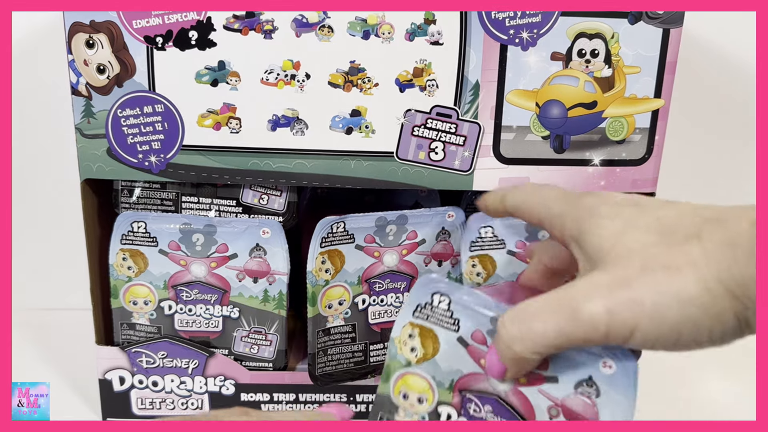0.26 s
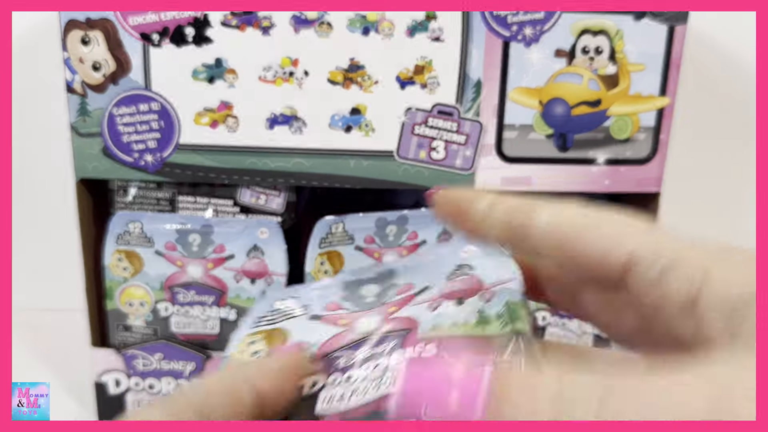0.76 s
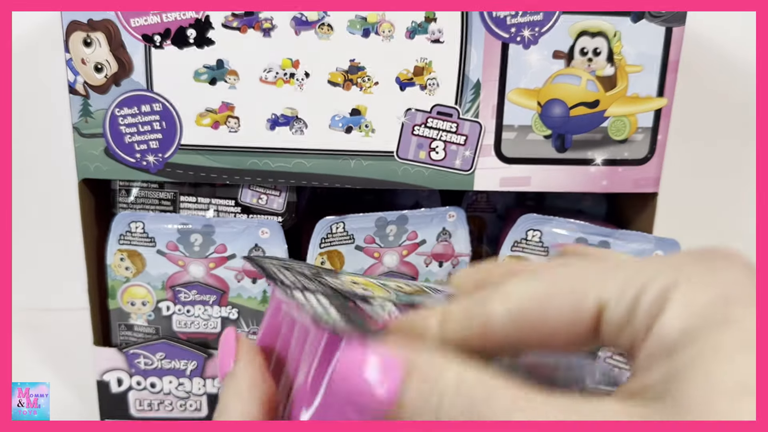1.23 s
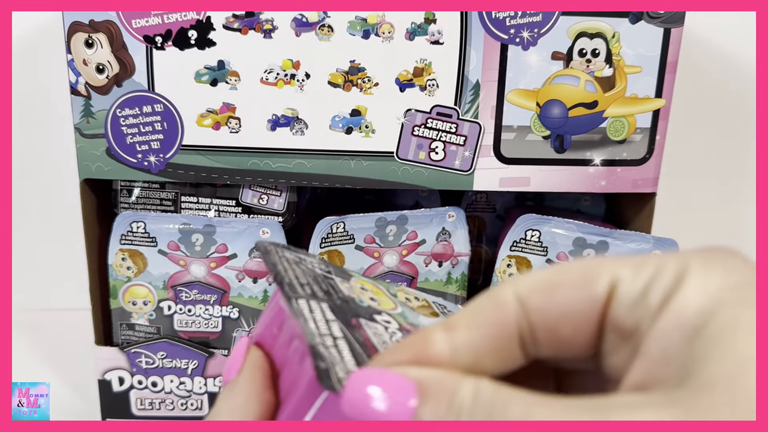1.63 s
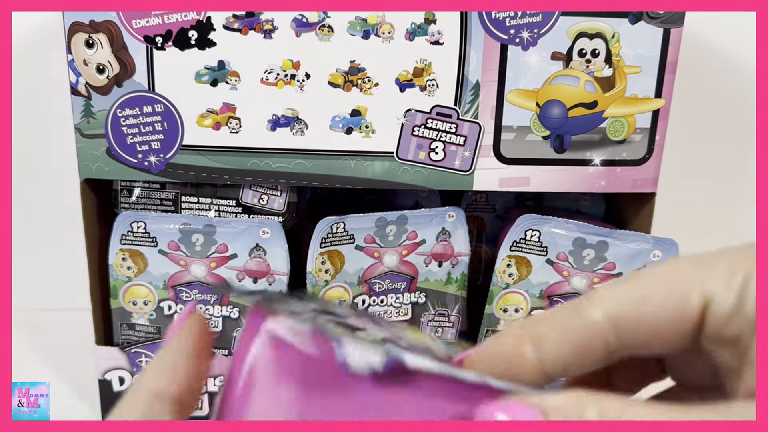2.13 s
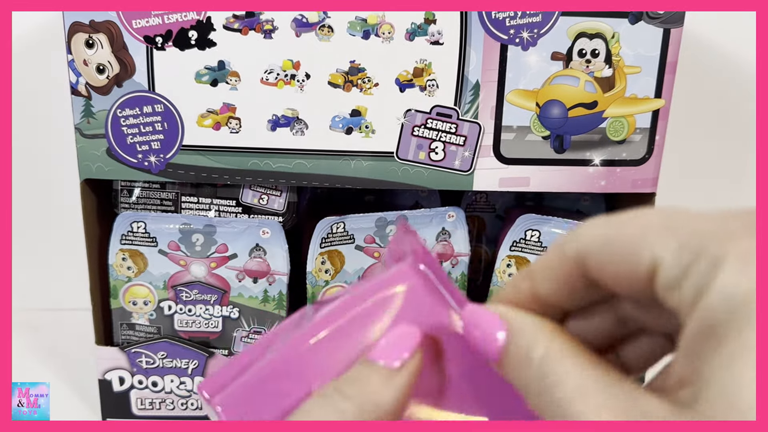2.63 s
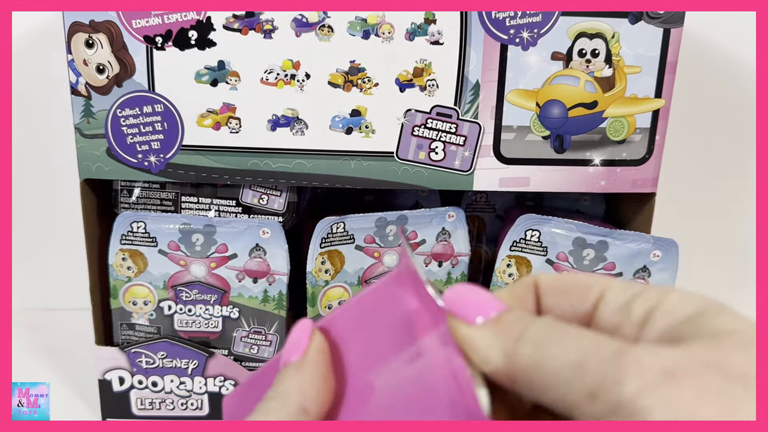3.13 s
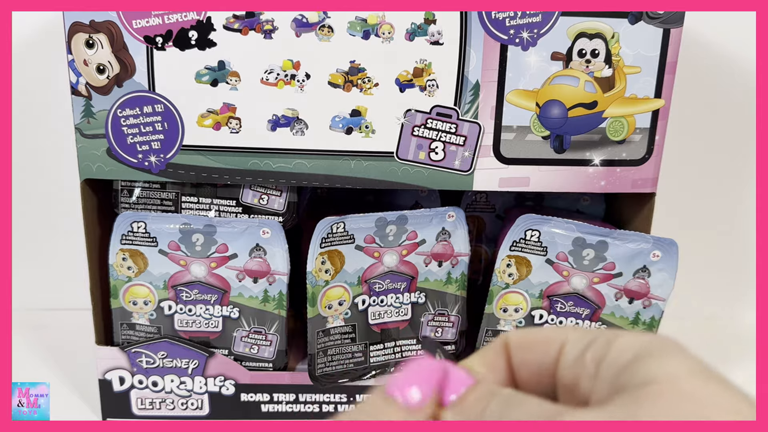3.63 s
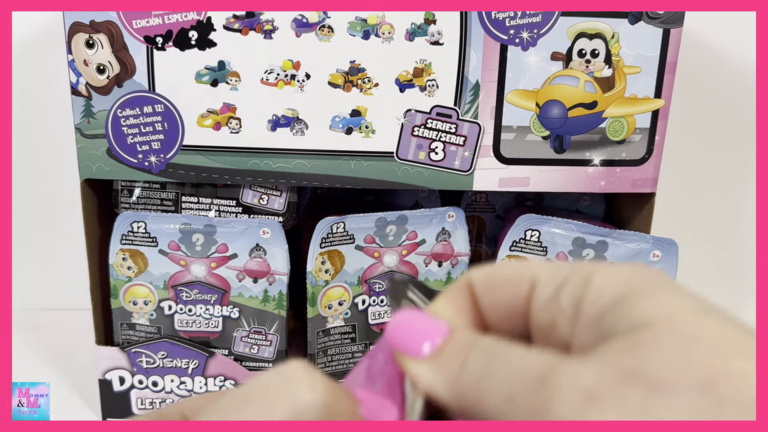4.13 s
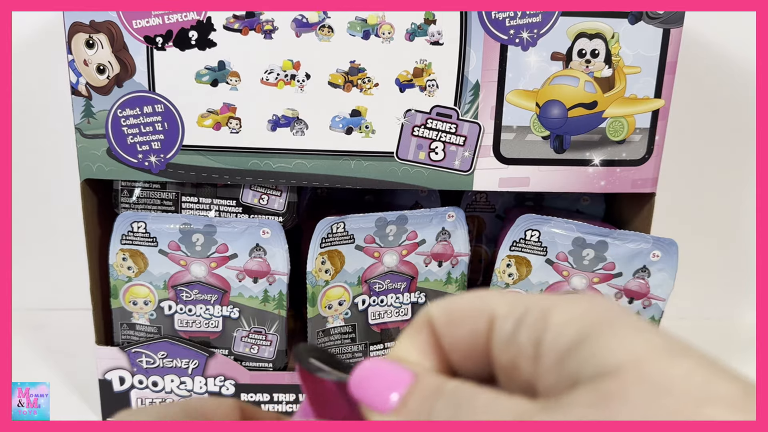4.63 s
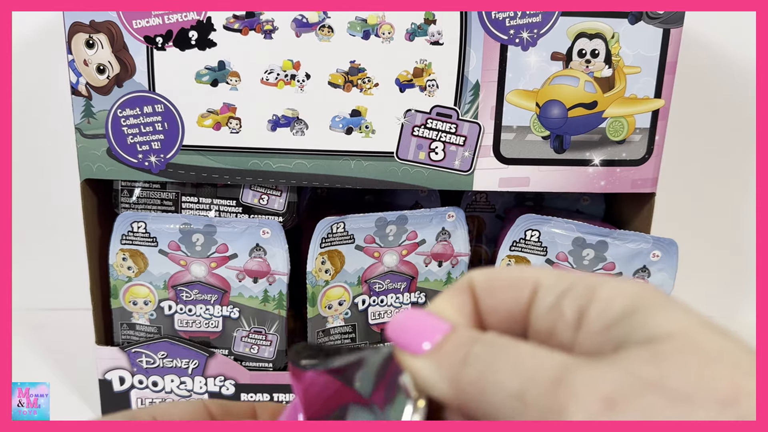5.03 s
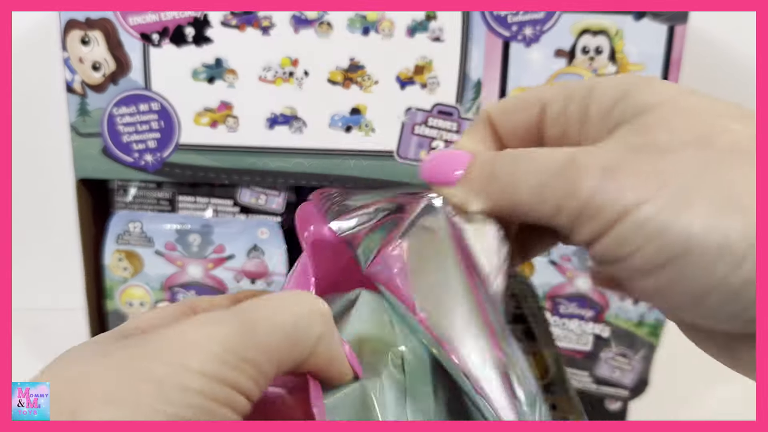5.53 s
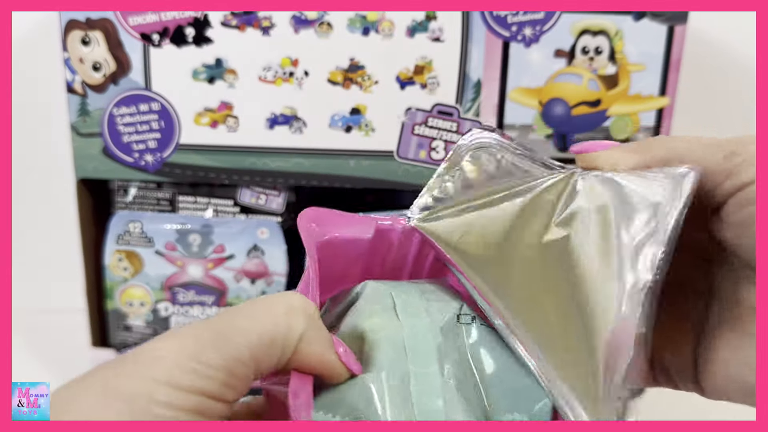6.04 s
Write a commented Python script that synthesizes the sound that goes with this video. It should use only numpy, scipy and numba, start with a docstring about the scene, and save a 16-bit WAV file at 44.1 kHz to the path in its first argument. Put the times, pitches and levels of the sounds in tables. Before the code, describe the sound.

Close, crisp crackles and hollow pops of a foil pouch being handled, then ripped open by hand.

```python
"""A foil packet is pulled from a carton, turned in the fingers and torn open close to a stereo phone.
Each crease buckles in a short run of slips: a bright crack, a ring of the sheet, then a puff of the air
in the bag. The hollow pouch pops under the fingers and countless small creases rustle in between,
in a small dry room over a low hum."""
import sys
import numpy as np
from scipy import signal
from scipy.fft import rfft, irfft
from scipy.io import wavfile
from numba import njit

SR = 44100
rng = np.random.default_rng(int(sys.argv[2]) if len(sys.argv) > 2 else 0)


def dump_mix(stems):
    """Bounce the given channels to the path in sys.argv[1] as a 16-bit WAV at rate SR."""
    frames = np.atleast_2d(stems).T  # one column per channel
    limited = np.clip(frames, -1, 1)  # hard clip at full scale
    pcm = np.round(limited * 32767).astype(np.int16)
    wavfile.write(sys.argv[1], SR, pcm)


N = 276948

# Modes of the air in the bag, the foil sheet and a crease.
# Each row: frequency in Hz, energy share in dB, seconds to fade 60 dB.
BAG = [(80, -5, 0.14), (143.5, -3, 0.1), (205, -7, 0.074), (260.8, 1, 0.065), (317.6, 3, 0.056),
       (424, -1, 0.029)]
SHEET = [(525, 0, 0.031), (711, 1.6, 0.026), (925, -2.5, 0.019), (1137, -1.5, 0.017), (1644, -1, 0.017),
         (2153, -0.14, 0.01), (2918, 0.5, 0.007), (3797, 4.5, 0.004), (5280, 5.5, 0.003)]
CREASE = [(4500, -4, .002), (6300, -5, .0017), (8200, -1, .0017), (10000, 0, .0015), (12300, -1, .0012),
          (15000, 0, .0012)]


def snaps(slips_per_ms, scatter_db, settle_ms, settle_db, max_slips, settle_slips):
    """Creases buckle in runs of slips that crack, ring and puff; weaker slips follow as the foil settles."""
    # Each row: start in seconds, length in ms, sheet energy in dB, crack and puff in dB over the sheet.
    buckles = [(.024, 9.2, -35.5, -20, -6), (0.044, 14.6, -29, -63, -1.5), (0.063, 1.52, -33.5, 2, -3),
               (0.114, 34, -27, -36, 3), (.264, 13.3, -34.5, -0.5, -17), (0.284, 23.8, -26, -7, -8),
               (.537, 34, -26, -11, 2.5), (.61, 37.5, -27, -12, 1), (.645, 2.2, -28.5, -10, 4),
               (.799, 2.2, -31.5, 0, -16), (.869, 4.66, -31.5, -4, -5.5), (1.195, 1.05, -25, -15, -39),
               (1.272, 9.05, -25, -9, -22), (1.821, 3.03, -19, 0, -15.5), (2.071, 3.37, -31.5, -11.5, -4),
               (2.494, 3.13, -31, -6.5, -3.5), (2.901, 1.03, -20, 6, -12), (3.02, 4.44, -29, -18.5, 0.5),
               (3.338, 5.87, -29, -5, -7), (3.377, 26.2, -26.5, -8, -6), (3.408, 9.4, -27, -17, -5),
               (3.433, 0.99, -32, -5.5, -8), (3.476, 1.3, -22.5, -1, -8), (3.615, 0.91, -25.5, -5, -8.5),
               (3.65, 60, -41, -13, -17), (3.961, 11.3, -17, -1.5, -15), (4.202, 26.8, -15.5, 3.5, -8),
               (4.444, 10.5, -29.5, 6.5, -18), (4.457, 7.17, -26.5, 5, -15.5),
               (4.533, 2.15, -23.5, 6.5, -7), (4.551, 3.96, -18, -0.5, -7.5), (4.669, 4.35, -21.5, 8, -9.5),
               (4.684, 2.62, -16, -16, -10), (4.837, 2.24, -30.5, 0.5, -15), (4.875, 0.88, -23, 3.5, -15),
               (4.961, 1.12, -30, 6.5, -39), (4.991, 0.98, -26.5, 5, -0.5), (5.054, 1.98, -31.5, -2, -2),
               (5.174, 5.13, -33, 3.5, -11), (5.222, 1.23, -26, 2, -5.5), (5.242, 1.085, -28, 3, -17),
               (5.498, 7.6, -31.5, 1, -4), (5.533, 1.34, -23.5, 5.5, -2.5), (5.545, 49.8, -17, 2, -2.5),
               (5.632, 6.5, -25.5, 11, -4.5), (5.66, 17.7, -24, 0, -26), (5.684, 12.15, -23.5, 8, -4),
               (5.799, 8.2, -30.5, 14.5, 1), (5.858, 7.7, -26, 6, 1), (5.941, 1.09, -23.5, 6, -3.5),
               (6.004, 6.32, -25, 11.5, -6.5), (6.056, 1.08, -30, 4.5, -10), (6.12, 2.01, -25.5, 11, -1.5),
               (6.17, 2.1, -27.5, 5, -13.5), (6.248, 6.1, -23, 5.5, -2)]
    s, ms, db, crack_db, puff_db = np.transpose(buckles)
    ring_hz = 1383 * 2 ** (.03 * crack_db - .015 * puff_db)  # crisper rings higher, puffier lower
    when, size = np.moveaxis(rng.random((len(s), max_slips + settle_slips, 2)), 2, 0)
    when[:, 0], size[:, 0] = 0, .3  # a light slip leads
    when[:, 2], size[:, 2] = np.minimum(.8 / ms, .6), .93  # a firm one follows
    when[:, 1] = 1  # another closes the run
    late_ms = when * ms[:, None]
    # a longer snap shares its energy among more slips
    used = np.clip(3 + slips_per_ms * ms[:, None] - np.arange(max_slips + settle_slips), 0, 1)
    energy = used * undb(-2 * scatter_db * np.log(1 - size))
    energy /= energy.sum(axis=1, keepdims=True)
    # settling slips thin out and weaken with time
    remaining = 1 - when[:, max_slips:]
    late_ms[:, max_slips:] = ms[:, None] - settle_ms * np.log(remaining)
    energy[:, max_slips:] = undb(2 * settle_db) * size[:, max_slips:] * remaining
    snap, slip = np.nonzero(energy)
    slip_s = s[snap] + late_ms[snap, slip] / 1000
    slip_db = db[snap] + 10 * np.log10(energy[snap, slip])
    main = slip < max_slips
    crack = ring(CREASE, slip_s + .00033, slip_db + crack_db[snap],
                 push_s=.000074, colour_db=4.7, detune=.1, spread=.16)
    sheet = ring(SHEET, slip_s + .0005, slip_db,
                 push_s=.000091, colour_db=3, detune=.079, spread=.68, centre_hz=ring_hz[snap], octaves=1.43)
    puff = ring(BAG, slip_s[main] + .0022, (slip_db + puff_db[snap])[main],
                push_s=.0013, colour_db=1.75, detune=.091, spread=.15)
    return crack + sheet + puff


def pouch_pops():
    """The hollow pouch rings under a finger or a hard snap; higher pops have a crisper edge."""
    # Each row: start in seconds, energy in dB, pitch in Hz.
    knocks = [(.184, -29.5, 320), (.24, -31.5, 710), (.392, -35.5, 417), (.58, -34, 1392),
              (1.048, -29, 1560), (1.47, -29, 1074), (1.552, -39.5, 1010), (1.789, -34.5, 899),
              (1.824, -13, 1580), (2.095, -36.5, 517), (2.297, -33.5, 783.4), (2.585, -30.5, 672),
              (2.902, -20.5, 1002), (2.99, -25, 2070), (3.047, -18, 400), (3.093, -26, 522),
              (3.127, -24, 405), (3.176, -37, 370), (3.204, -30, 1110), (3.226, -35.5, 1598),
              (3.255, -38.5, 686), (3.479, -19.5, 1145), (3.827, -25.5, 296), (4.162, -38.5, 271.7),
              (4.195, -30, 699.3), (4.817, -36, 928.2), (4.877, -26, 559.2), (4.938, -28, 501.2),
              (4.991, -20.5, 2440), (5.19, -33.5, 2150), (5.243, -28, 1661), (5.275, -27.5, 1060),
              (5.369, -28, 519), (5.394, -32.5, 2160), (5.454, -35.5, 378), (5.903, -34, 724)]
    # Each row: multiple of the pitch, energy share in dB, cycles to fade 60 dB.
    pouch_modes = [(.55, -9.5, 13), (1, -1.5, 14), (1.5, -6.5, 9.5), (2.2, -6.5, 8)]
    s, db, hz = np.transpose(knocks)
    body = ring(pouch_modes, s, db,
                push_s=.00066, colour_db=1.46, detune=.032, spread=.24, pitch=hz[:, None])
    s, db, hz = np.repeat(knocks, 3, axis=0).T  # three quick slips to an edge
    edge_db = db - 11.5 + 5.1 * np.log2(hz / 1383)
    edge = ring(SHEET[4:] + CREASE, s + .0043 * rng.random(len(s)), edge_db,
                push_s=.00026, colour_db=1.8, detune=.16, spread=.3, centre_hz=2 * hz, octaves=2)
    return body + edge


def crease_ticks():
    """Lone thin ticks of a crease edge, each split into three quick slips."""
    # Each row: start in seconds, energy in dB.
    ticks = [(1.241, -34.5), (1.514, -33.5), (2.476, -30.5), (2.967, -23.5), (3.075, -39), (3.316, -29),
             (3.79, -36), (3.97, -11), (4.469, -22), (5.096, -37), (5.518, -18.5), (6.095, -30),
             (6.215, -32)]
    s, db = np.repeat(ticks, 3, axis=0).T
    return ring(CREASE, s + .003 * rng.random(len(s)), db - 10 * np.log10(3),
                push_s=.0002, colour_db=2, detune=.1, spread=.3)


def rustle():
    """Skin rubs the foil in a fine hiss, small creases tick and ring, the bag rumbles along."""
    s, _, treble_db = small_slips(per_s=1200, scatter_db=1.3, patchy_db=5.9)
    rub = ring(CREASE, s, treble_db - 10, push_s=.0001, colour_db=2.4, detune=.14, spread=.26,
               centre_hz=np.full(len(s), 8200.), octaves=.46)
    s, sheet_db, treble_db = small_slips(per_s=400, scatter_db=4.25, patchy_db=2.4)
    ticks = ring(CREASE, s[::20], treble_db[::20] - 1, push_s=.00024, colour_db=4.9, detune=.2, spread=.26)
    sheet = ring(SHEET, s, sheet_db - 11, push_s=.0006, colour_db=5, detune=.1, spread=.7,
                 centre_hz=np.full(len(s), 950.), octaves=1.8)
    rumble = ring(BAG, s[::8], sheet_db[::8] - 3.5, push_s=.0021, colour_db=5.4, detune=.15, spread=.15)
    return rub + ticks + sheet + rumble


def small_slips(per_s, scatter_db, patchy_db):
    """Times, sheet levels and treble levels of random slips: mostly faint, coming in patches."""
    # Each row: time in seconds, base level of the sheet rustle in dB, of the treble rustle in dB.
    handling = [(0, -63, -76), (.04, -45.5, -61.5), (0.56, -48.5, -64.5), (1.38, -44.5, -58),
                (1.55, -53, -79), (1.78, -80, -76), (1.9, -43, -54.5), (2.3, -48.5, -65.5),
                (2.44, -45.5, -57), (2.68, -60, -70.5), (3.5, -54.5, -66), (3.67, -57.5, -62.5),
                (4.34, -54.5, -67), (4.69, -52, -49), (5.11, -56, -68), (5.27, -42.5, -54),
                (5.51, -44, -66), (5.58, -25, -31), (5.74, -46, -50), (6.28, -43.5, -82)]
    t, *curves = np.transpose(handling)
    when, size = rng.random((int(per_s * N / SR), 2)).T
    patches = np.interp(when, np.linspace(0, 1, 200), rng.standard_normal(200))
    swing_db = patchy_db * patches - scatter_db * np.log(1 - size * .975)
    s = when * N / SR
    return [s] + [np.interp(s, t, curve) + swing_db for curve in curves]


def ring(modes, s, db, push_s, colour_db, detune, spread, centre_hz=None, octaves=1., pitch=None):
    """Slips at times s shake the modes; the foil keeps changing shape, so each has its own tone."""
    # Each row: frequency in Hz, lead of the left microphone in radians.
    left_lead = [(300, .2), (1700, .5), (3300, 2.), (5200, 2.2), (8000, .9), (11000, .1)]
    # Each row: frequency in Hz, left over right in dB.
    left_tilt = [(100, 2), (800, 4), (12000, 2)]
    # Where the hands hold the packet. Each row: time in seconds, left over right in dB.
    hand_pan = [(0, -3), (1.4, 0), (5, -1), (6.28, -1.5)]
    mode_hz, share_db, t60 = np.transpose(modes)
    colour, tune, phase, place = np.moveaxis(rng.standard_normal((len(s), len(modes), 4)), 2, 0)
    share_db = share_db + colour_db * colour
    if centre_hz is not None:  # favour the modes near this frequency
        share_db -= 6 * (np.log2(mode_hz / centre_hz[:, None]) / octaves) ** 2
    share = undb(share_db) / np.sqrt((undb(share_db) ** 2).sum(axis=1, keepdims=True))
    if pitch is not None:  # modes given as multiples and cycles
        mode_hz = mode_hz * pitch
        t60 = t60 / mode_hz
    hz = np.minimum(mode_hz * np.exp(detune * tune), .4 * SR)
    fade = np.log(1000) / (t60 * SR)
    size = undb(db)[:, None] * share * np.sqrt(4 * fade * SR / 100) * np.exp(2j * phase)
    pan_db = on_log(left_tilt, hz) + np.interp(s, *np.transpose(hand_pan))[:, None]
    stereo = np.exp(.5j * (on_log(left_lead, hz) + spread * place)) * undb(pan_db / 2)
    at = np.repeat(np.clip(s * SR, 0, N - 1).astype(int), len(modes))
    pole = np.exp(2j * np.pi * hz / SR - fade)
    length = np.broadcast_to(t60 * SR * 3 / 5, hz.shape).astype(int).ravel()
    push = np.exp(-1 / (push_s * SR))
    return grains(at, length, pole.ravel(), push, (size * stereo).ravel(), (size / stereo).ravel(), N)


@njit
def grains(at, length, pole, push, left, right, n):
    """Damped rings that swell over the push time, heard at both microphones."""
    out = np.zeros((2, n))
    for k in range(len(at)):
        z, rest = 1. + 0j, 1.
        for i in range(at[k], min(at[k] + length[k], n)):
            out[0, i] += (1 - rest) * (z * left[k]).imag
            out[1, i] += (1 - rest) * (z * right[k]).imag
            z, rest = z * pole[k], rest * push + 1e-18
    return out


def room(dry, level_db):
    """Diffuse echoes of near walls, unrelated left and right; the mids linger longest."""
    # Each row: frequency in Hz, seconds to fade 60 dB.
    decay_times = [(200, 0.15), (2500, 0.25), (15000, 0.15)]
    hz, t, noise = signal.stft(rng.standard_normal((2, SR // 2)), SR, nperseg=128)
    decay = undb(-60 * t / on_log(decay_times, hz + 1)[:, None])
    tail = signal.istft(noise * decay, SR, nperseg=128)[1]
    tail *= np.clip(np.arange(tail.shape[1]) / SR / .0012, 0, 1)
    tail *= undb(level_db) / np.sqrt((tail ** 2).sum(axis=1, keepdims=True))
    return signal.fftconvolve(dry, tail, axes=1)[:, :N]


def hum(level_db):
    """Steady low room noise, narrow in the bass and wide in the treble."""
    # Each row: frequency in Hz, relative level in dB.
    spectrum = [(30, 6), (66, 4), (666, -19), (6380, -42), (9970, -46), (16000, -86)]
    hz = np.maximum(np.arange(N // 2 + 1) * SR / N, 1)
    mid, side = rfft(rng.standard_normal((2, N))) * undb(on_log(spectrum, hz))
    width = np.clip(hz / 1500, .25, 1)
    out = irfft(mid + width * side * np.array([[1], [-1]]), N)
    return out * undb(level_db) / np.sqrt(np.mean(out ** 2))


def undb(db):
    """Gain of a level in dB."""
    return 10 ** (np.asarray(db) / 20)


def on_log(table, hz):
    """Read (Hz, value) points on a log-frequency axis."""
    points_hz, values = np.transpose(table)
    return np.interp(np.log(hz), np.log(points_hz), values)


def scene():
    """The packet up close, a little room around it, the hum underneath."""
    foil = snaps(slips_per_ms=.6, scatter_db=2.5, settle_ms=12, settle_db=-12.5,
                 max_slips=64, settle_slips=8)
    foil += pouch_pops() + crease_ticks() + rustle()
    return foil + room(foil, level_db=-9) + hum(level_db=-56.5)


def record(dry):
    """The phone drops the deepest bass, rounds the loudest peaks and cuts the top."""
    low_cut = signal.butter(3, 45, "high", fs=SR, output="sos")
    high_cut = signal.ellip(10, .2, 90, 16000, fs=SR, output="sos")
    return signal.sosfilt(high_cut, np.tanh(signal.sosfilt(low_cut, dry)))


dry = scene()
out = record(dry)
dump_mix(out)
```